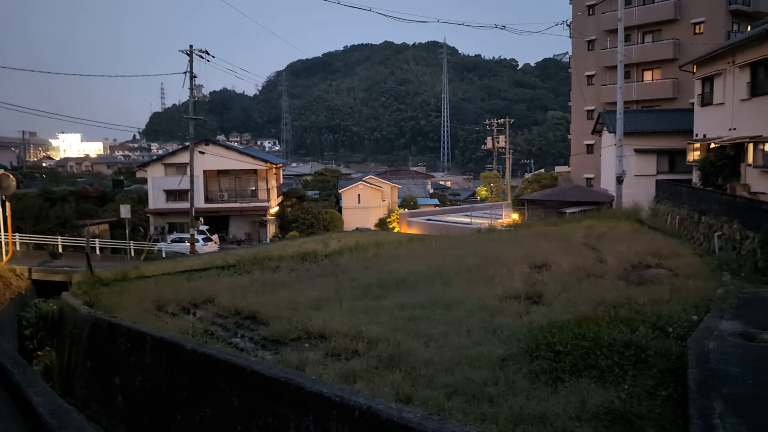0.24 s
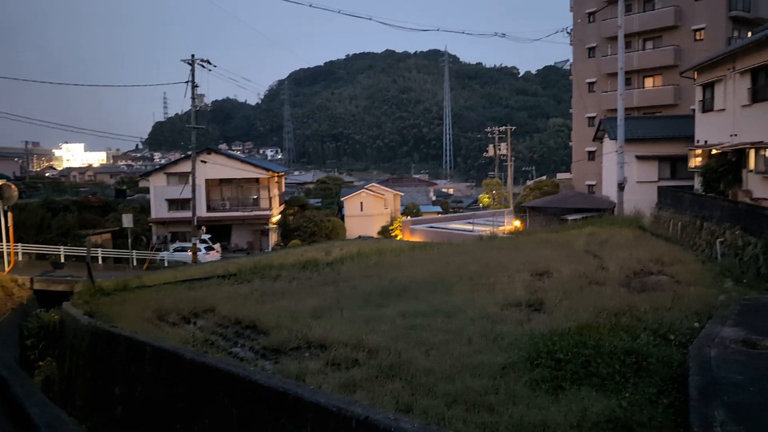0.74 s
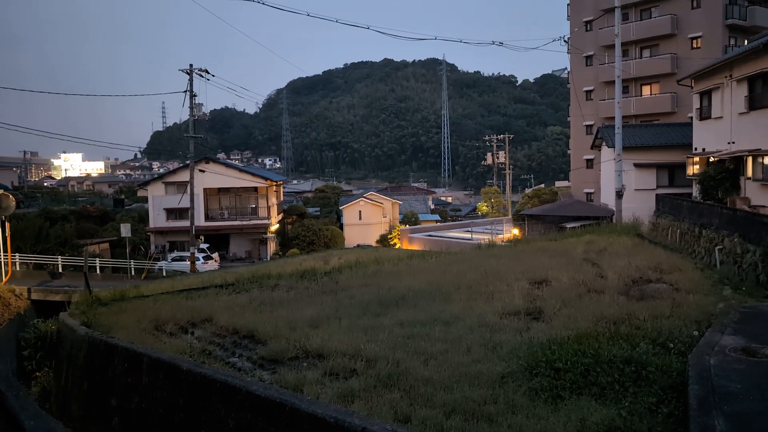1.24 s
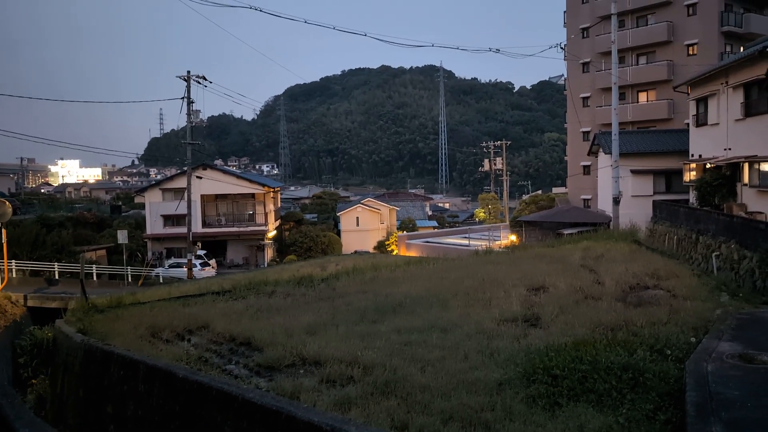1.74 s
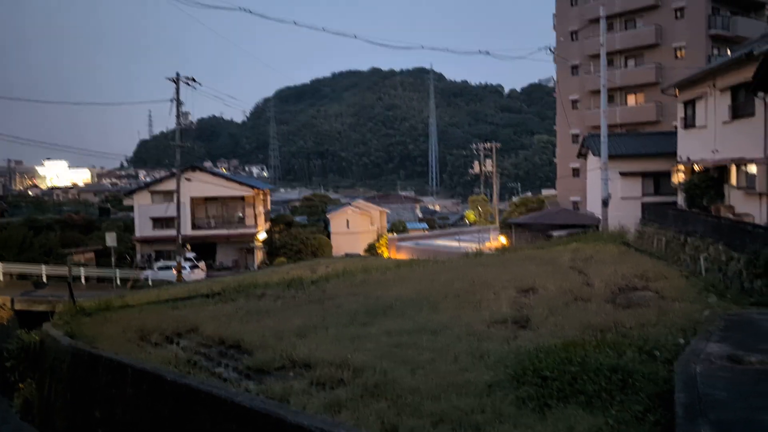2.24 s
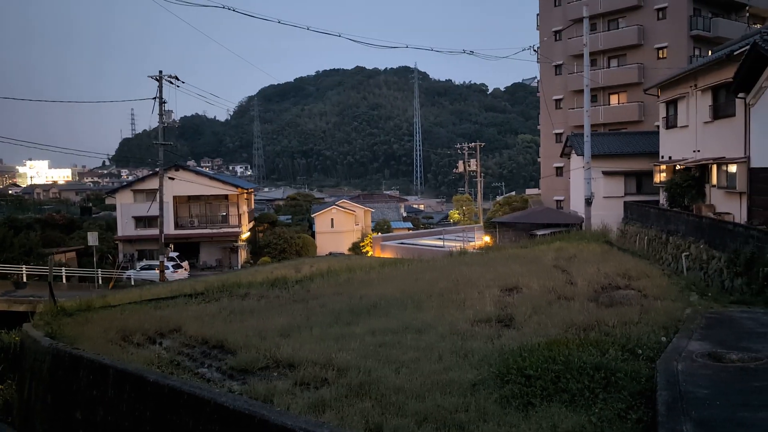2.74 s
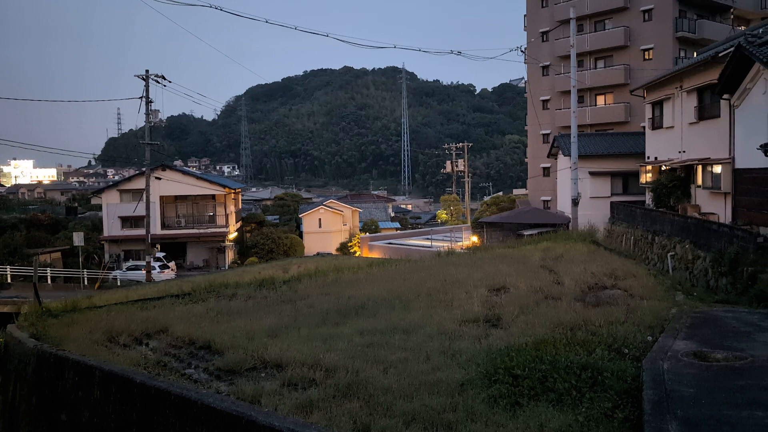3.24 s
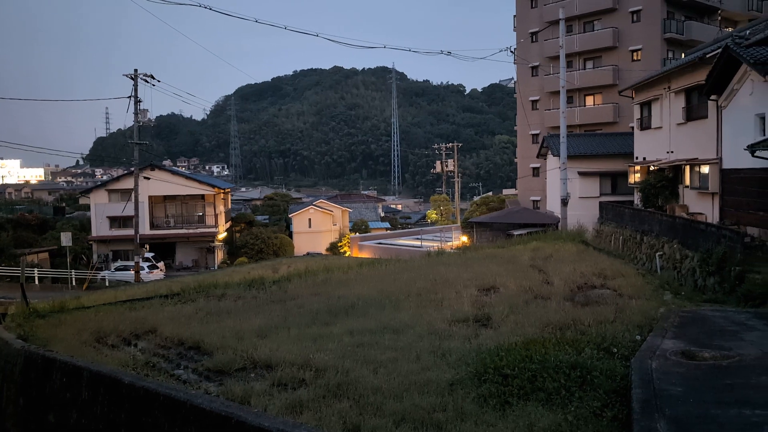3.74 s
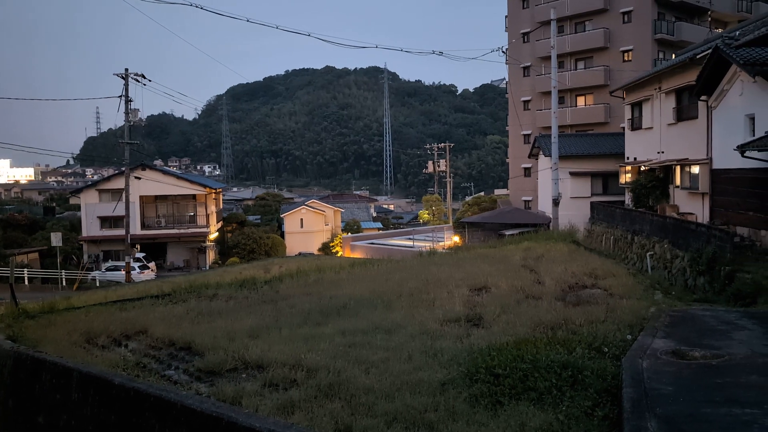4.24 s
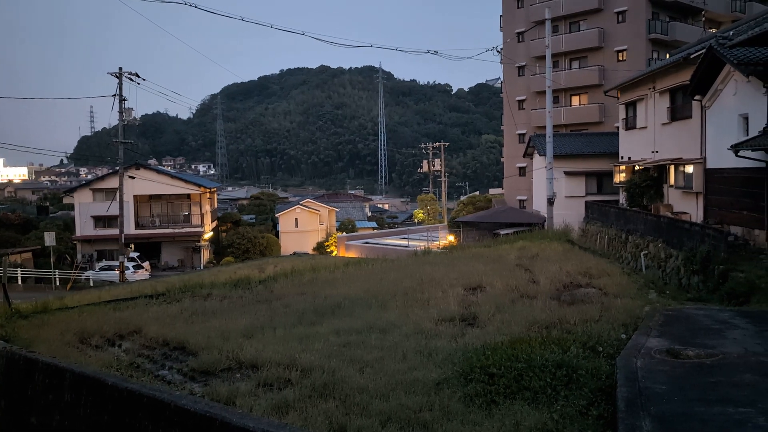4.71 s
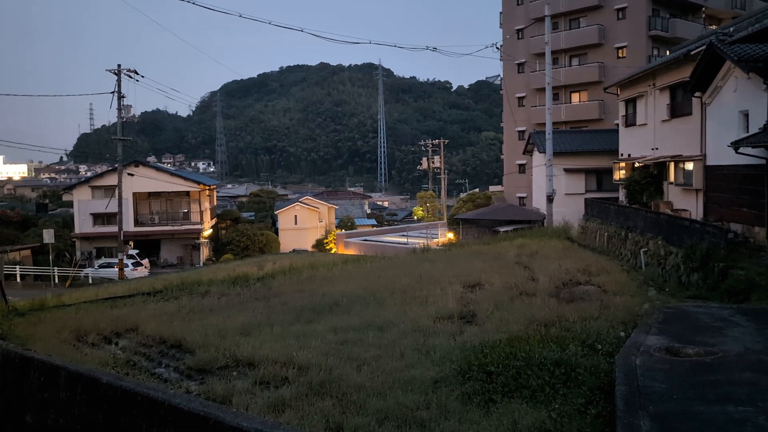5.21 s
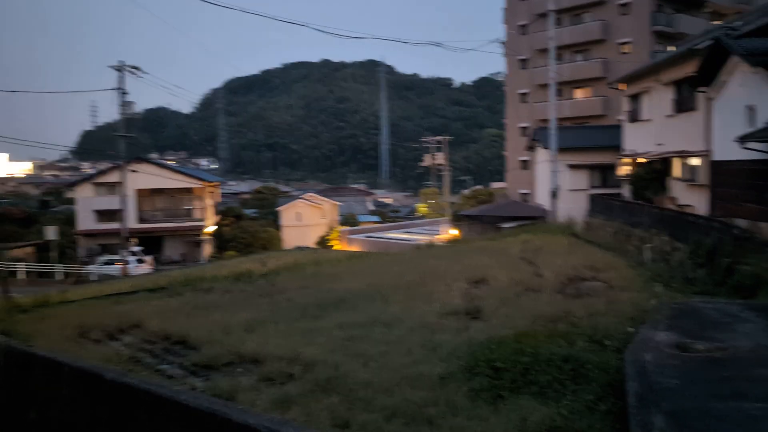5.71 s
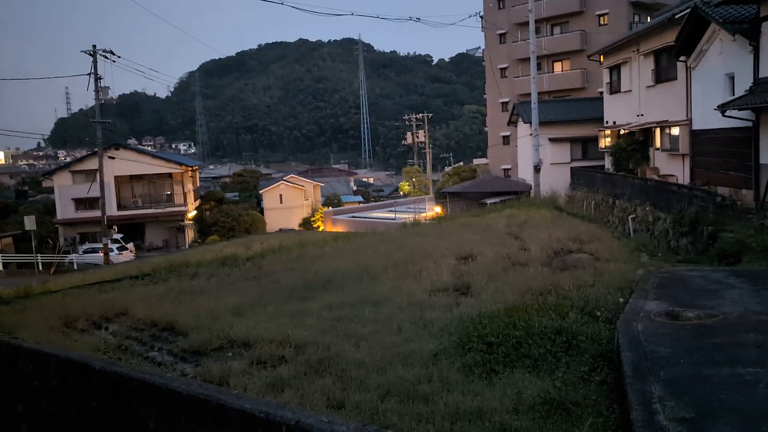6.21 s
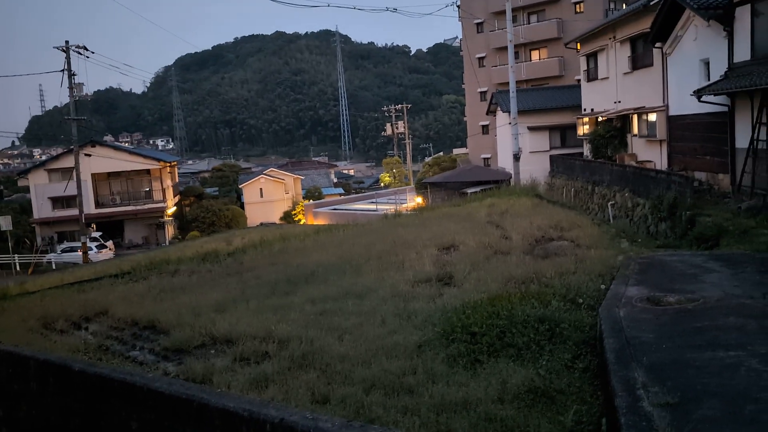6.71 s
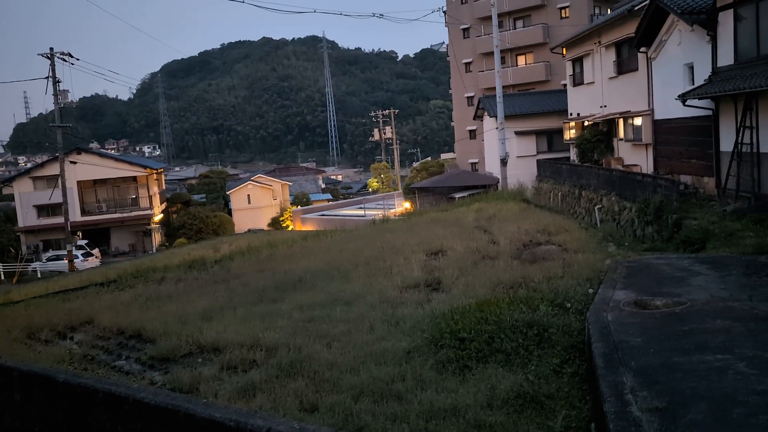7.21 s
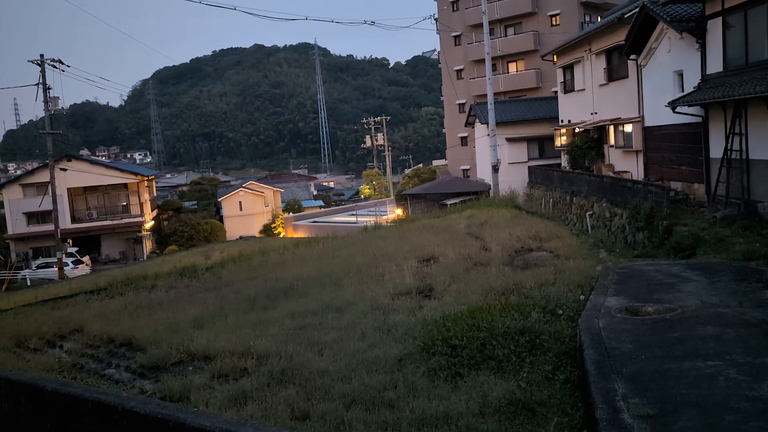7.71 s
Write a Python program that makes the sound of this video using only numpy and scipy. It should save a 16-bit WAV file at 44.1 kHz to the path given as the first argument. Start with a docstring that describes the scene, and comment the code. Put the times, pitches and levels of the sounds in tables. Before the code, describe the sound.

Tree frogs near and far quack in rapid, overlapping raspy chatter at dusk, over low town rumble and a softly trickling, plopping roadside drain.

```python
"""A grassy plot between houses at dusk: near tree frogs take turns, and a far chorus fills the gaps.
Each note is a fast train of throat pulses in two rising resonances, scattered by grass and walls.
Shaped noise and small ringing bubbles make the water in a roadside drain; it ticks and plops.
Behind it the town rumbles and hums on filtered noise and wavering tones, and a far car goes by."""
import sys
import numpy as np
from scipy import signal
from scipy.fft import rfft, irfft, next_fast_len
from scipy.io import wavfile
from scipy.ndimage import map_coordinates

SR = 44100
rng = np.random.default_rng(int(sys.argv[2]) if len(sys.argv) > 2 else 0)


def to_wav(sig):
    """Store sig (one row per channel, or 1-D mono) as 16-bit WAV at the path in sys.argv[1].

    Samples outside -1..1 are clipped; the rate is SR.
    """
    pcm = np.clip(np.atleast_2d(sig), -1, 1) * 32767
    pcm = np.round(pcm).astype(np.int16)
    wavfile.write(sys.argv[1], SR, pcm.T)  # frames by channels


N = 351036

# Slow fader moves of town and drain, before each layer's trim:
# time_s, rumble_db, flow_db, spray_db
BACKGROUND_LEVELS = [(0.0, -53.5, -59, -66.5), (0.15, -53, -61.5, -66), (1.24, -51.5, -59, -63),
                     (5.3, -48.5, -55, -60), (6.63, -49.5, -57, -61), (7.63, -48.5, -54.5, -61),
                     (7.96, -48.5, -56.5, -59.5)]
# What the vocal sac radiates: frequency_hz, gain_db
SAC_RESPONSE = [(400, -45), (1100, -23), (1290, -4.5), (1460, 0.5), (1900, -0.5), (2300, 1), (2800, -5),
                (3350, 1.5), (3700, -3.5), (4050, -7), (5000, -4.5), (7000, 6), (8200, -30)]


def amp(db):
    """Decibels to gain."""
    return 10 ** (np.asarray(db) / 20)


def unit(x):
    """Scale a signal to rms 1."""
    return x / np.sqrt(np.mean(x ** 2) + 1e-20)


def seconds():
    """The time of each sample."""
    return np.arange(N) / SR


def along(points, hz):
    """Read a curve of (Hz, value) points on a log frequency axis."""
    f, v = np.transpose(points)
    return np.interp(np.log(hz + 1), np.log(f + 1), v)


def curves(rows):
    """One value per sample for each column after the time."""
    times, *columns = np.transpose(rows)
    return [np.interp(seconds(), times, column) for column in columns]


def wobble(rate):
    """A smooth random curve, rate knots a second."""
    knots = rng.standard_normal(int(N * rate / SR) + 4)
    return map_coordinates(knots, [np.arange(N) * rate / SR])


def filtered(x, response):
    """Multiply the spectrum of x by a response of frequency."""
    size = next_fast_len(N + 8192)
    spectrum = rfft(x, size) * response(np.fft.rfftfreq(size, 1 / SR))
    return irfft(spectrum, size)[..., :N]


def coloured(x, points):
    """Equalise x with a (Hz, dB) curve."""
    return filtered(x, lambda hz: amp(along(points, hz)))


def panned(db):
    """Left and right gains for a level difference; positive favours the left."""
    return amp(np.array([[.5], [-.5]]) * db)


def add(out, x, s):
    """Mix x into out, starting at time s."""
    start = round(s * SR)
    a, b = max(start, 0), min(start + x.shape[-1], N)
    if b > a:
        out[..., a:b] += x[..., a - start:b - start]


def scattered(x, t60, wet_db, lag=0):
    """A direct path, late at the left port, and a burst of reflections unlike at each port."""
    t = np.arange(int(t60 * SR) + 64) / SR
    reflections = unit(rng.standard_normal((2, len(t))) * amp(-60 * t / t60))
    paths = reflections * amp(wet_db) / np.sqrt(len(t))
    paths[0, int(np.clip(lag * SR, 0, 60))] += 1
    paths[1, 0] += 1
    return signal.fftconvolve(x[None], paths, axes=1)


def arriving(pair, alike, lag_s=0):
    """Two unrelated signals made partly alike: the left port hears a late share of the right one."""
    alike = np.clip(alike, 0, .99)
    late = filtered(pair[1], lambda hz: np.exp(-2j * np.pi * hz * lag_s))
    left = np.sqrt(1 - alike ** 2) * pair[0] + alike * late
    return np.array([left, pair[1]])


def town():
    """Far traffic rumbles, a distant machine hums, and an engine's drone swells late."""
    # Rumble spectrum: frequency_hz, density_db (per Hz)
    rumble_colour = [(25, -27), (33, -30), (48, 1), (75, 1), (110, -4.5), (170, -10.5), (255, -12.5),
                     (295, -19.5), (345, -26), (600, -55.5)]
    # Stereo likeness of the rumble: frequency_hz, left_right_likeness (1 = same)
    rumble_likeness = [(40, 0.97), (140, 0.97), (300, 0.84), (600, 0.29)]
    # Machine hum: time_s, level_db
    hum_levels = [(0, -47.5), (0.6, -47), (1.2, -45), (2.2, -50), (3.3, -42), (4.1, -49.5), (4.7, -41),
                  (5.1, -46.5), (5.8, -42.5), (7, -58), (7.96, -43)]
    # Tones of a far engine: pitch_hz, level_db
    drone_tones = [(74.2, -51.5), (92.8, -51)]
    hum_hz, waver_hz = 59.5, 0.23
    drone_start_s, drone_rise_s, drone_idle_db = 5.75, 0.28, -13  # idle: level before the swell

    def mid_side_response(hz):
        angle = np.arccos(np.clip(along(rumble_likeness, hz), -1, 1)) / 2
        return amp(along(rumble_colour, hz)) * [np.cos(angle), np.sin(angle)]

    def tone(hz):
        phase = 2 * np.pi * np.cumsum(hz + waver_hz * wobble(2.96)) / SR
        return np.sqrt(2) * np.sin(phase)  # rms 1

    mid, side = filtered(rng.standard_normal((2, N)), mid_side_response)
    rumble_db = curves(BACKGROUND_LEVELS)[0] + 4.5
    rumble = unit(np.array([mid + side, mid - side])) * amp(rumble_db)
    hum = tone(hum_hz) * amp(curves(hum_levels)[0])
    idling = np.clip(1 - (seconds() - drone_start_s) / drone_rise_s, 0, 1)
    drone = sum(amp(db) * tone(hz) for hz, db in drone_tones) * amp(drone_idle_db * idling)
    return rumble + hum + drone


def road():
    """Tyre hiss on a far road: traffic that slowly grows, and one car that swells quickly and fades."""
    # Tyre noise spectrum: frequency_hz, density_db (per Hz)
    tyre_colour = [(250, -57), (370, -15.5), (450, -4), (600, -3.5), (800, -19), (1500, -64)]
    # a far car comes out from behind the houses, loudest at car_s
    car_s, car_db, car_rise_s, car_fade_db_per_s = 4.63, -55, .3, 4
    # other tyres draw slowly nearer
    traffic_start_db, traffic_db_per_s = -65.5, 1
    since = seconds() - car_s
    car_rise = np.clip(1 + since / car_rise_s, 0, 1)
    car = amp(car_db - car_fade_db_per_s * np.maximum(since, 0)) * car_rise
    traffic = amp(traffic_start_db + traffic_db_per_s * seconds())
    # the road lies straight ahead, so there is no lag between the ports
    hiss = arriving(rng.standard_normal((2, N)), alike=0.74)
    return unit(coloured(hiss, tyre_colour)) * np.hypot(car, traffic) * panned(-0.36)


def bubble(hz, cycles, rise=0.11):
    """A ringing air pocket whose pitch climbs as it surfaces."""
    age = np.arange(int(5 * cycles / hz * SR) + 2) / SR * hz / cycles  # in decay times
    ring = np.sin(2 * np.pi * cycles * age * (1 + rise * age / 4))
    return ring * np.exp(-age) * (1 - np.exp(-6 * age))


def bubbles(count, hz, spread, cycles, size_db):
    """A stream of small bubbles of random pitch, size and place, at rms 1."""
    out = np.zeros((2, N))
    for when, pitch, size, side in rng.random((count, 4)):
        ring = bubble(hz * np.exp(spread * (2 * pitch - 1)), cycles)
        add(out, panned(10 * (side - .5)) * amp(size_db * size ** 2) * ring, when * N / SR)
    return unit(np.array([scattered(port, t60=0.045, wet_db=8)[0, :N] for port in out]))


def drain():
    """Running water: a noisy wash with short bubbles in it, fine spray and tiny, high bubbles."""
    # Wash spectrum: frequency_hz, density_db (per Hz)
    flow_colour = [(250, -36), (350, -29), (460, -8.5), (620, 1.5), (800, 2.5), (1020, 4.5), (1250, -5),
                   (1800, -5.5), (2600, -4), (3400, -13.5), (4200, -13.5), (8000, -48)]
    # Spray spectrum: frequency_hz, density_db (per Hz)
    spray_colour = [(2000, -51), (4300, -1.5), (5300, -2.5), (6500, 0), (7900, -5.5), (8300, -15),
                    (10300, -17.5), (11500, -15), (13000, -24), (15500, -63)]
    lag_s = 0.000449  # the drain lies to the right: late at the left port
    _, flow_db, spray_db = curves(BACKGROUND_LEVELS)
    gurgle = bubbles(count=900, hz=2100, spread=.35, cycles=3, size_db=10)
    gurgle = gurgle + amp(12) * rng.standard_normal((2, N))
    flow = unit(coloured(arriving(gurgle, 0.47, lag_s), flow_colour)) * panned(-3.5)
    fizz = rng.standard_normal((2, N)) * amp(0.48 * wobble(13))
    tinkle = bubbles(count=400, hz=5500, spread=.28, cycles=9, size_db=14)
    spray = unit(coloured(arriving(fizz, 0.11, lag_s), spray_colour)) + amp(-11) * tinkle
    return amp(flow_db + 8.0) * flow + amp(spray_db + 1.2) * spray


def burst(t60):
    """The sharp noise of a drop's impact, unlike at each port."""
    t = np.arange(SR // 10) / SR
    return rng.standard_normal((2, len(t))) * amp(-60 * t / t60)


def splashes(count=330, size_db=3.0):
    """Drops tick on the water: a few clear ones, which ring a tiny bubble, among many faint ones."""
    # Clear drops, levels before trim and colour:
    # start_s, level_db, low_splash_db (relative), bubble_pitch_hz
    clear_drops = [(1.048, -52.5, -3, 4440), (1.731, -57, 6, 4400), (1.8324, -62, 14, 5560),
                   (2.2832, -56, 0, 7010), (2.4902, -52.5, 1, 7240), (2.5262, -54, 2, 6200),
                   (2.7516, -57, 9, 7170), (2.8085, -58, 9, 4750), (2.8814, -65, 18, 4400),
                   (3.167, -48, 0, 5830), (3.5463, -55, -6, 4480), (3.8422, -60, 6, 5940),
                   (4.061, -55, 14, 4700), (4.3181, -54, 8, 4800), (4.404, -56.5, 14, 5990),
                   (4.6828, -52, -1, 6210), (5.0429, -50, -8, 7320), (5.1088, -54, 2, 6350),
                   (5.2071, -52, 3, 4520), (5.8526, -48, -3, 6530), (5.8845, -51, 8, 6890),
                   (6.5819, -52, 1, 6150), (6.9287, -48, 4, 4560), (7.0314, -51, 2, 7360),
                   (7.4789, -54, 1, 6240)]
    bright, low, faint = np.zeros((3, 2, N))
    for s, db, low_db, hz in clear_drops:
        drop = amp(db) * (burst(t60=0.0064) + amp(-1) * burst(t60=0.093))
        ring = scattered(bubble(hz, cycles=11.0), t60=0.041, wet_db=4)
        add(bright, drop, s)
        add(low, amp(low_db - 3) * drop, s)
        add(low, amp(db + low_db - 6.5) * ring, s)
    for s, size in zip(rng.uniform(0, N / SR, count), rng.exponential(1, count)):
        add(faint, amp(size_db * min(size, 3.2)) * burst(t60=0.059), s)
    clear = coloured(bright, [(3000, -30), (7000, 3), (11500, -5.5), (15500, -15)])
    clear = clear + coloured(low, [(2500, -25), (4200, 7), (7700, -5), (8500, -29)])
    faint_colour = [(2500, -28), (4200, 4.5), (7800, 5.5), (8400, -6.0), (15500, -12.5)]
    patter = unit(coloured(faint, faint_colour))
    # the faint drops follow the spray fader and come in flurries
    patter_db = curves(BACKGROUND_LEVELS)[2] - 3 + 1.5 * wobble(6.9)
    return (clear + patter * amp(patter_db)) * panned(1.8)


def plops():
    """Each plop is a dull slap that rings an air pocket for a few cycles."""
    # Larger bubbles in the drain, levels before trim:
    # start_s, level_db, pitch_hz, slap_db (relative), left_right_db
    large_bubbles = [(2.4024, -36.5, 1520, -12, -1), (3.003, -39, 1477, -13, -8),
                     (3.1078, -43, 1520, -9, -7), (3.6695, -32, 1750, -13.5, -7),
                     (6.0304, -36, 2190, -25, -15), (6.611, -31, 1930, -28, -5),
                     (6.9287, -32.5, 1650, -21, -9), (7.5309, -27.5, 1690, -24, -2),
                     (7.8074, -31, 1780, -10.5, -7)]
    out = np.zeros((2, N))
    for s, db, hz, slap_db, pan_db in large_bubbles:
        level = amp(db) * panned(pan_db)
        ring = scattered(bubble(hz, cycles=1.2), t60=0.025, wet_db=2.5)
        slap = scattered(bubble(.5 * hz, cycles=0.6), t60=0.041, wet_db=-1.5)
        add(out, level * amp(0.5) * ring, s)
        add(out, level * amp(slap_db + 15) * slap, s + 0.00084)
    return out


def note(length, hz, low_db, ring_s=0.0011, edge_db=20, squareness=2.7):
    """One quack: throat pulses ring two resonances about an octave apart, which rise as the sac fills."""
    pulse_hz, note_spread, pulse_jitter = 196, .07, .09  # spread and jitter: log scatter
    climb, level_off = 0.18, .16  # pitch rise over a note and its flattening, as shares of the pitch
    lower_ratio, lower_edge_db = .52, 4.5  # lower resonance: pitch ratio, extra fall at the ends
    # the rate differs a little from note to note
    rate = pulse_hz * np.exp(rng.normal(0, note_spread))
    chance = rng.standard_normal((120, 4))[:int(1.3 * length * rate)]
    # uneven pulses make the note rasp
    when = np.cumsum(np.exp(pulse_jitter * chance[:, :1]), axis=0) / rate
    size_db = 1.5 * chance[:, 1:2]
    place = (when - when.mean()) / length
    # the pitch climbs fast, then levels off
    pitch = hz * (1 + climb * place - level_off * place ** 2 + 0.026 * chance[:, 2:3])
    low_pitch = pitch * (lower_ratio + 0.038 * chance[:, 3:])
    t = np.arange(SR // 80) / SR
    upper = np.sin(2 * np.pi * pitch * t) * np.exp(-t / ring_s) * (1 - np.exp(-t / 0.00044))
    lower = np.sin(2 * np.pi * low_pitch * t) * np.exp(-t / .001) * (1 - np.exp(-t / .0002))
    # the note swells and fades; the lower resonance sounds mostly in its middle
    edge = np.abs(2 * place) ** squareness
    both = unit(upper) + amp(low_db - lower_edge_db * edge) * unit(lower)
    pulses = both * amp(size_db - edge_db * edge)
    # overlapping pulses add up sample by sample
    samples = (when * SR).astype(int) + np.arange(len(t))
    return np.bincount(samples.ravel(), pulses.ravel())


def far_frogs(count=12):
    """Each distant frog keeps its own beat and pitch; their notes blur into an even rattle."""
    out = np.zeros((2, N))
    for start, beat, size in rng.random((count, 3)):
        voice = np.zeros(N)
        quack = note(0.18, 3000 + 400 * size, -3.0, ring_s=0.00063)
        for s in np.arange(-start * .32 - .1, N / SR, .29 + .07 * beat):
            add(voice, quack * amp(rng.normal(0, 2.7)), s + rng.normal(0, .012))
        out += scattered(voice, t60=.2, wet_db=12.5)[:, :N]
    level_db = -50 + 0.39 * seconds()  # slowly louder
    return unit(coloured(out, SAC_RESPONSE)) * amp(level_db)


def houses(x):
    """The walls around the plot answer with a half-second noise tail that dies soonest in the bass."""
    # Reverb decay: frequency_hz, t60_s
    yard_decay = [(500, 0.2), (3000, 1), (9000, 0.87)]
    hz, t, z = signal.stft(rng.standard_normal((2, SR // 2)), SR, nperseg=256)
    decay = amp(-60 * t / along(yard_decay, hz)[:, None])
    tail = signal.istft(z * decay, SR, nperseg=256)[1]
    return signal.fftconvolve(x, tail / np.linalg.norm(tail[0]), axes=1)[:, :N]


def near_frogs():
    """Frogs on the right answer each other, each about three notes a second, scattered by the grass."""
    # One row per quack, levels before trim and colour:
    # middle_s, length_s, upper_resonance_hz, level_db, lower_resonance_db (relative)
    quacks = [(-0.001, 0.16, 3230, -47.5, -2.5), (0.121, 0.15, 3340, -44.5, -3.5),
              (0.323, 0.18, 3280, -48, -1), (0.447, 0.13, 3260, -45, -0.5),
              (0.608, 0.14, 3340, -45.5, -0.5), (0.768, 0.18, 3240, -43.5, -4.5),
              (0.921, 0.23, 3290, -44, -2.5), (1.102, 0.12, 3300, -42.5, -6),
              (1.245, 0.16, 3330, -42.5, -3.5), (1.42, 0.15, 3300, -40.5, -8), (1.568, 0.15, 3280, -44, -2),
              (1.732, 0.19, 3260, -45, -3.5), (1.921, 0.2, 3140, -41.5, -5),
              (2.053, 0.17, 3290, -43.5, -4.0), (2.214, 0.18, 3270, -43, -5),
              (2.379, 0.18, 3270, -43.0, -4.0), (2.534, 0.17, 3330, -43, -2),
              (2.72, 0.22, 3290, -44.5, -4.5), (2.847, 0.19, 3350, -43, -4), (2.997, 0.16, 3300, -42, -5),
              (3.154, 0.18, 3280, -44, 0.5), (3.332, 0.18, 3300, -41.5, -5),
              (3.437, 0.19, 3420, -46.5, -0.5), (3.64, 0.21, 3210, -39, -5.5),
              (3.791, 0.19, 3300, -45.5, -2), (3.966, 0.14, 3350, -41, -3.5),
              (4.103, 0.19, 3170, -48, -1.0), (4.256, 0.17, 3280, -38, -3), (4.406, 0.14, 3340, -47.5, -2),
              (4.558, 0.17, 3380, -39, -5.5), (4.816, 0.2, 3210, -40.5, -3.5), (4.924, 0.2, 3350, -43, -5),
              (5.069, 0.19, 3240, -47.5, 1), (5.176, 0.2, 3240, -42, -3), (5.354, 0.19, 3350, -42.5, -8),
              (5.507, 0.17, 3200, -42, -0.5), (5.696, 0.17, 3290, -46.5, -7),
              (5.829, 0.17, 3270, -42.5, -3.5), (5.998, 0.14, 3400, -43, -4),
              (6.147, 0.19, 3270, -41.5, -2.5), (6.309, 0.13, 3220, -48.5, 2),
              (6.449, 0.19, 3390, -40.0, -3.0), (6.619, 0.13, 3340, -52.5, 3),
              (6.766, 0.19, 3310, -42.5, -2.5), (6.929, 0.14, 3190, -46.5, 0.0),
              (7.089, 0.22, 3380, -42.5, -3), (7.301, 0.12, 3200, -48.5, -1),
              (7.431, 0.17, 3300, -41, -2.5), (7.587, 0.16, 3400, -44, -2.5),
              (7.741, 0.23, 3300, -42.5, -5.0), (7.915, 0.16, 3280, -52, 3.5)]
    pan_db, pan_spread_db = 1.94, 1.5  # before the colour of the ports
    out = np.zeros((2, N))
    for s, length, hz, db, low_db in quacks:
        quack = note(length, hz, low_db + 1.5)
        lag = rng.normal(12.5, 1.5) / SR  # late at the left port
        heard = scattered(quack, t60=.07, wet_db=1, lag=lag)
        # even out the energy of each port for the note's length
        heard /= np.sqrt(np.sum(heard ** 2, axis=1, keepdims=True) / (length * SR / 2))
        level = amp(db + 1.34) * np.hypot(1, amp(low_db))
        place = panned(rng.normal(pan_db, pan_spread_db))
        add(out, level * place * heard, s - len(quack) / SR / 2)
    return coloured(out, SAC_RESPONSE)


def scene():
    """Frogs and their echo over the water and the town."""
    background = town() + road()
    water = drain() + splashes() + plops()
    chorus = far_frogs()
    frogs = near_frogs()
    return background + water + chorus + amp(-15.5) * houses(frogs) + frogs


def record(dry):
    """The two microphone ports differ in colour; nothing is kept above the band limit."""
    # Port colour: frequency_hz, left_right_db
    port_tilt = [(400, -0.5), (700, 0), (900, 3.5), (1200, -2.5), (1600, -4), (2100, -9), (2800, -7),
                 (3300, -4), (4000, -0.5), (6000, 1), (12000, 0.5)]
    top_hz = 15720
    return filtered(dry, lambda hz: panned(along(port_tilt, hz)) * (hz < top_hz))


dry = scene()
out = record(dry)
to_wav(out)
```